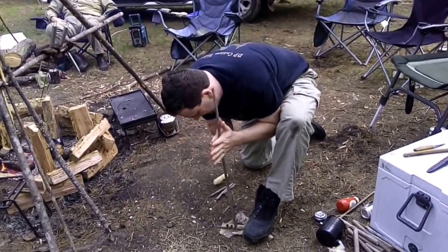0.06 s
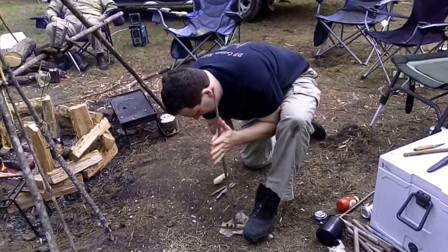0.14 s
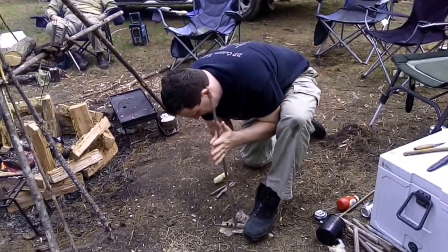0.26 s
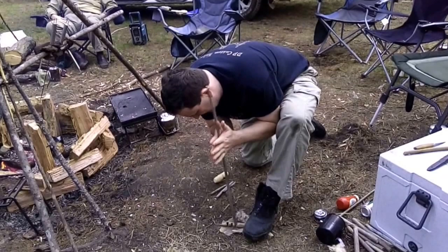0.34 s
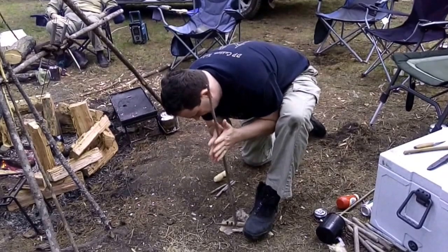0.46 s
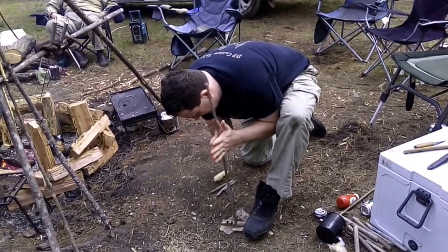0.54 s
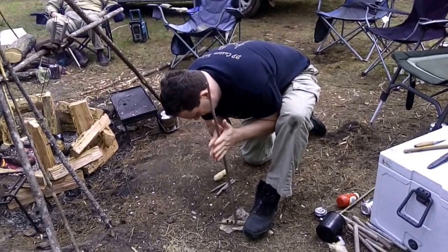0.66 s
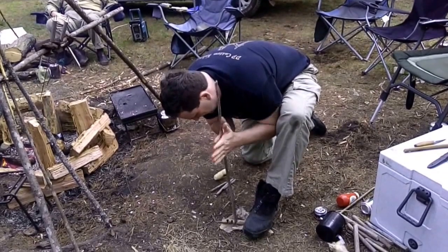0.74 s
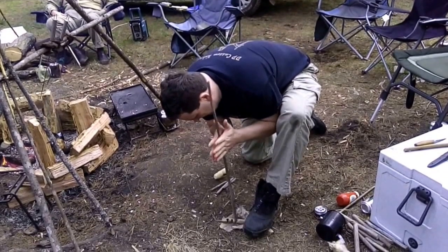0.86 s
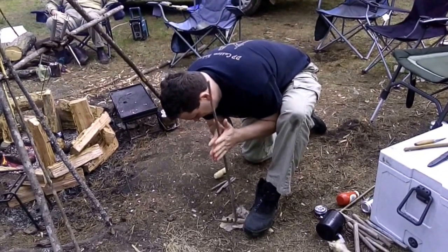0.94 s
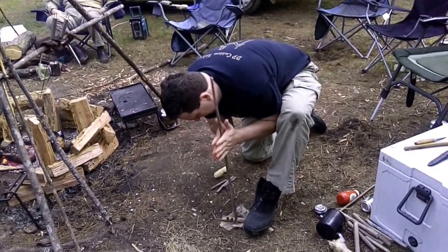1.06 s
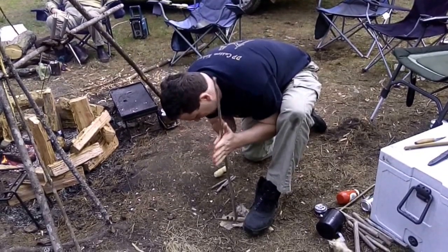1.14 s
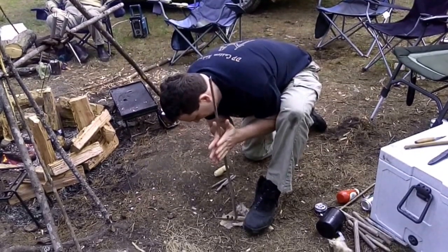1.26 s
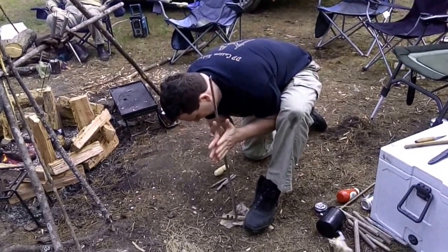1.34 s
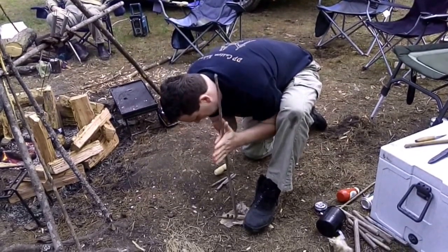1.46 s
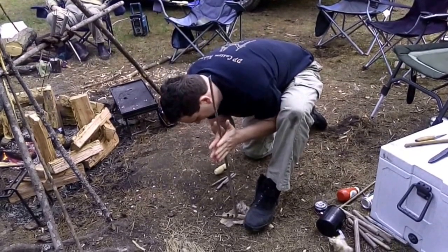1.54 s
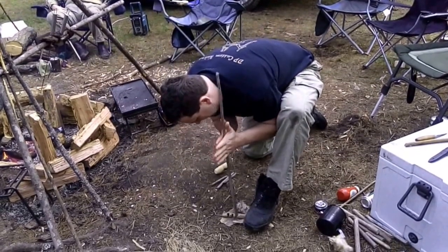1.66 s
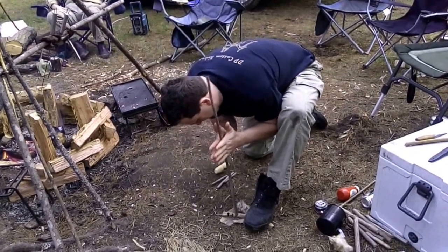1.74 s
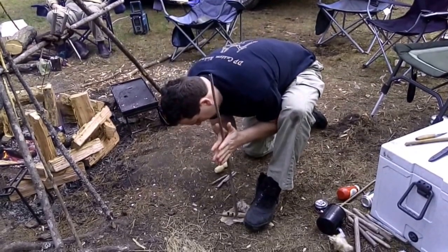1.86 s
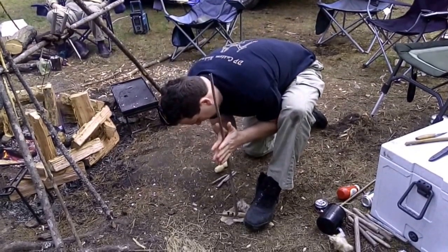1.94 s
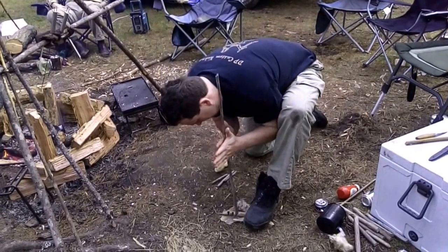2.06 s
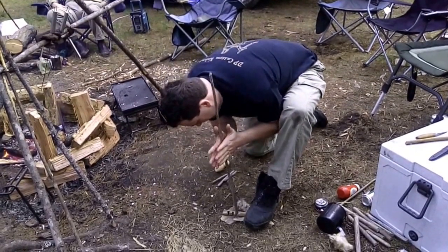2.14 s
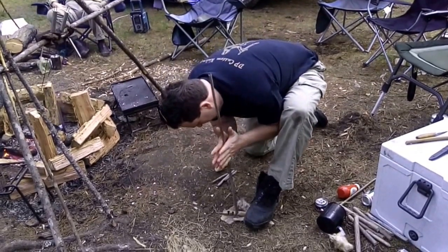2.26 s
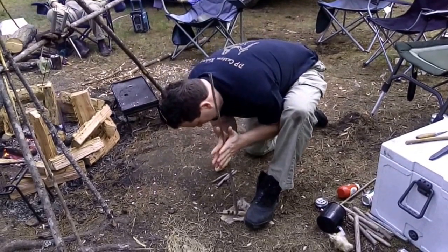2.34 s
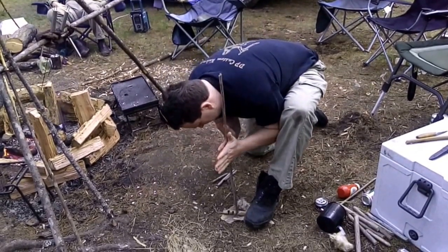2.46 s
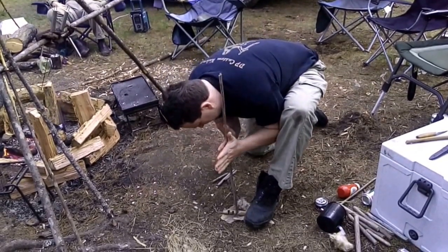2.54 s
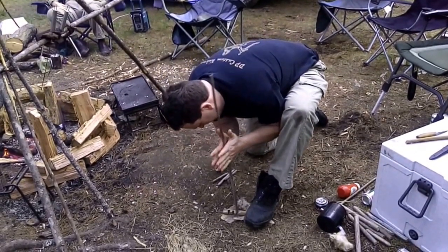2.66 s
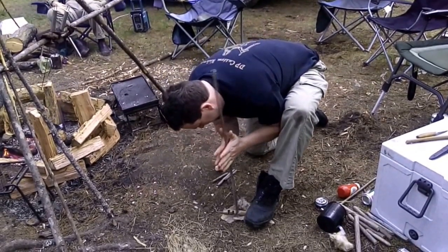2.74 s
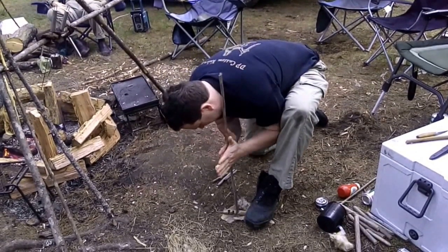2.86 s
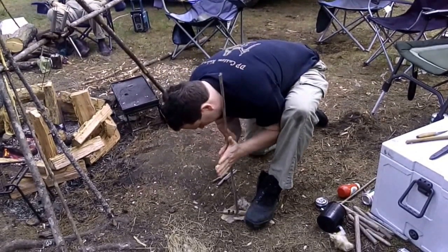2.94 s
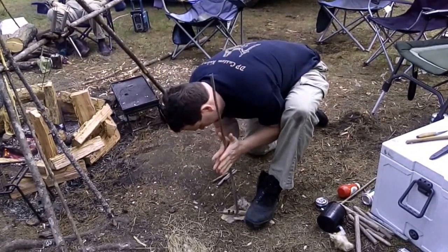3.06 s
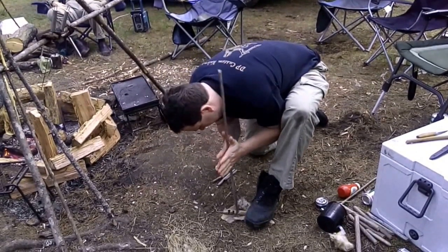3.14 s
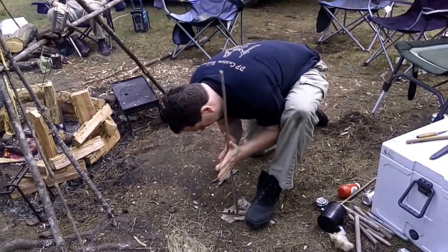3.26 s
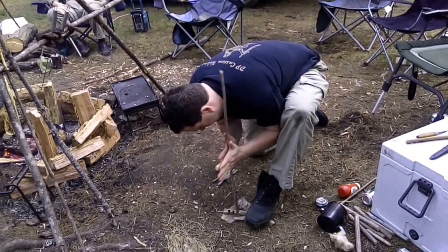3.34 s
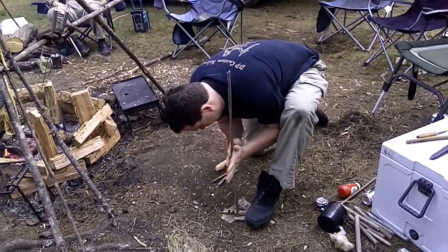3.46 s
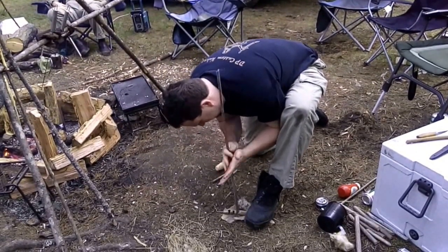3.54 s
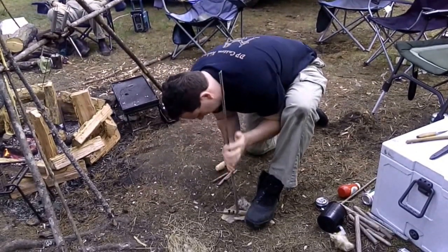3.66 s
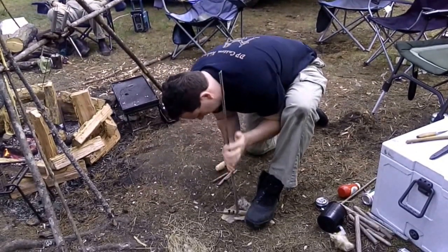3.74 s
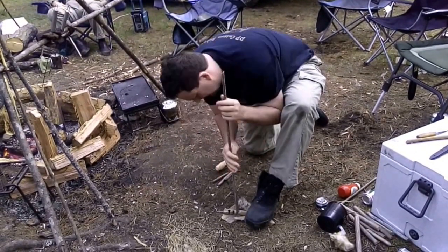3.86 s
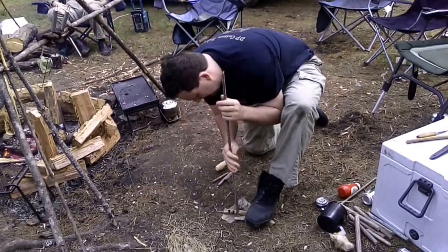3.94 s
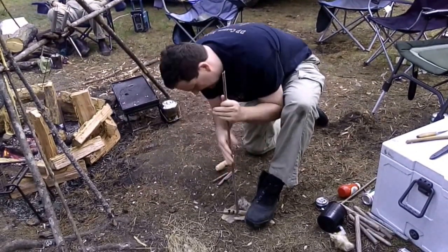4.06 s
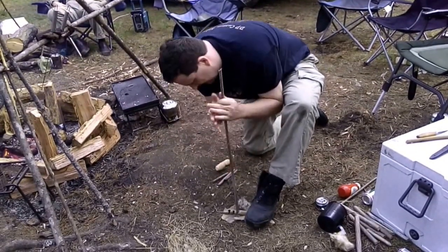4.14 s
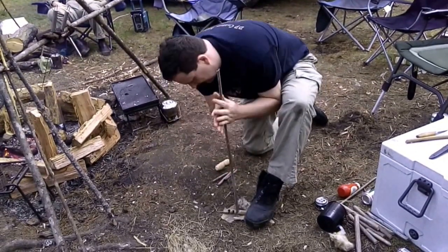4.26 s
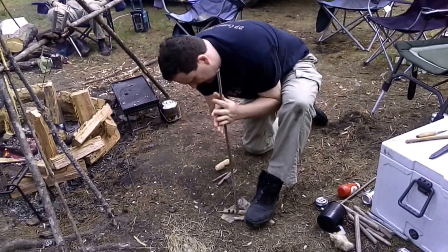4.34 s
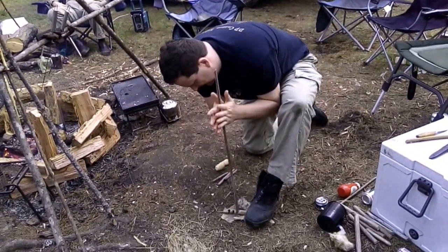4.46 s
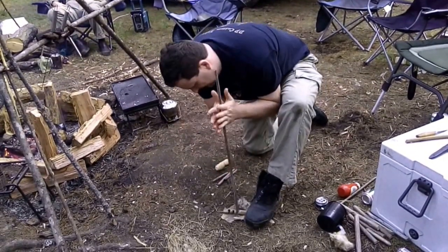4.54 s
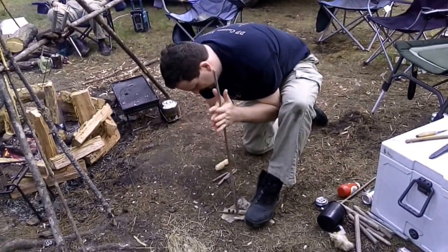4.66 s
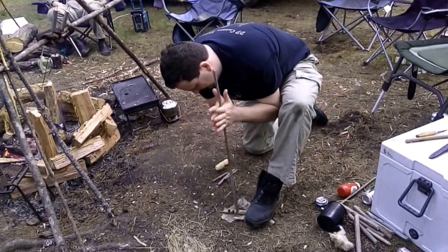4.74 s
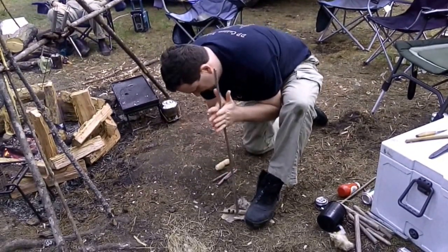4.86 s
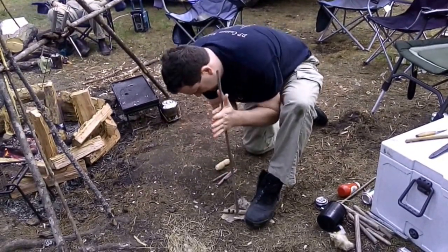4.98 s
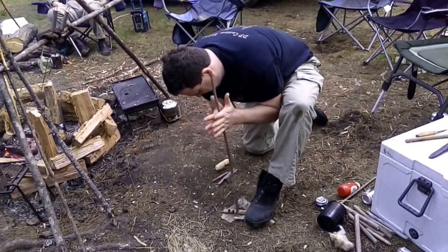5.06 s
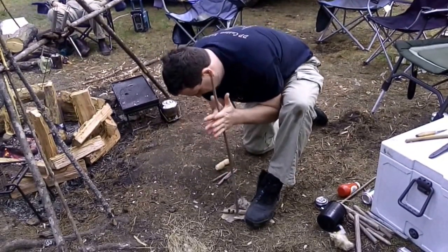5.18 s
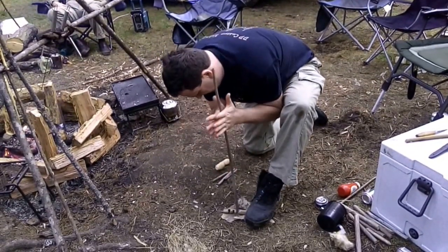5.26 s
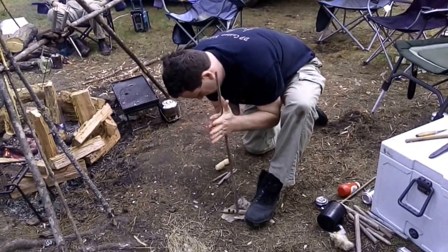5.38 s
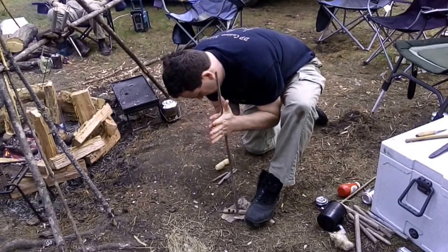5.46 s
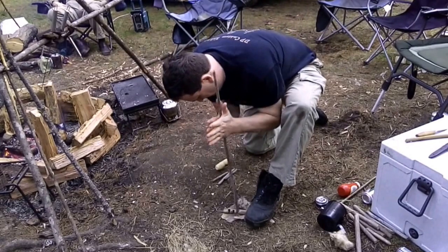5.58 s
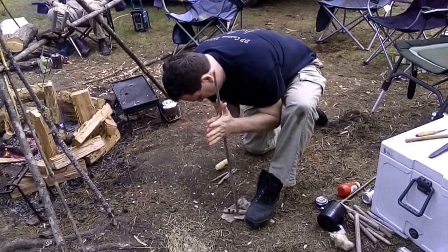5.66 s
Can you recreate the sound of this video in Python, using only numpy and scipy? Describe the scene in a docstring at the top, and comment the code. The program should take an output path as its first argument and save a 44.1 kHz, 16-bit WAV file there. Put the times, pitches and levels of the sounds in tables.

```python
"""A wooden spindle is rolled to and fro between two palms, its tip grinding in a board on the ground outdoors.
Each stroke is a swell of tiny random slips that hiss and ring the wood; ticks are short snaps with a knock,
and when the tip catches, ringing noise makes a hollow groan. After about four seconds the hands stop and slide
up the stick with a faint rustle of filtered slips and one low creak. A last stroke follows. Filtered noise
makes a quiet outdoor floor and a low rumble of uneven level, with brief swells in the pause."""
import sys
import numpy as np
from scipy import signal
from scipy.io import wavfile
from scipy.ndimage import uniform_filter1d

SR = 44100
rng = np.random.default_rng(int(sys.argv[2]) if len(sys.argv) > 2 else 0)


def to_wav(s):
    """Save 16-bit WAV."""
    ch = np.atleast_2d(s).T  # columns
    pcm = np.round(np.clip(ch, -1, 1) * 32767)  # PCM
    wavfile.write(sys.argv[1], SR, pcm.astype(np.int16))


N = 251983
T = np.arange(N) / SR  # time of every sample in seconds

# Strokes, out and back by turns. Each row: time of the turn in seconds, rub level at the turn in dB,
# rub level at full speed in dB, place of full speed within the stroke (0-1, later held to 0.2-0.8).
STROKES = [(0.022, -59.5, -30.5, 0.5), (0.178, -55.5, -29.5, 0.57), (0.288, -59, -29, 0.38),
           (0.418, -58, -31, 0.44), (0.515, -58, -26.5, 0.48), (0.622, -61.5, -29.5, 0.63),
           (0.73, -46.5, -27.5, 0.32), (0.843, -48.5, -29.5, 0.4), (0.974, -34.5, -26, 0.16),
           (1.073, -48, -29, 0.42), (1.183, -36.6, -26, 0.25), (1.284, -53, -27.5, 0.56),
           (1.407, -41, -23, 0.33), (1.517, -48, -26, 0.62), (1.626, -46.5, -25, 0.24),
           (1.734, -46.5, -25.5, 0.59), (1.836, -41.5, -25.0, 0.23), (1.948, -39, -24.5, 0.5),
           (2.057, -43.5, -22.5, 0.24), (2.177, -35, -25, 0.42), (2.278, -43.5, -23.0, 0.35),
           (2.387, -37, -24, 0.57), (2.486, -49.5, -23, 0.3), (2.589, -44, -24.5, 0.52),
           (2.691, -48.5, -23.5, 0.43), (2.791, -52, -26.0, 0.61), (2.897, -53, -25, 0.41),
           (3.013, -41.5, -24, 0.61), (3.116, -46, -25.0, 0.38), (3.235, -38, -26, 0.46),
           (3.328, -52.5, -26.5, 0.26), (3.446, -39, -26.5, 0.41), (3.537, -52.5, -25, 0.29),
           (3.652, -40.5, -26, 0.56), (3.744, -49.5, -27.0, 0.38), (3.858, -40, -26.5, 0.63),
           (3.948, -46, -26, 0.27), (4.052, -43, -27, 0.63), (4.156, -53, -28, 0.3),
           (5.571, -63, -28.5, 0.46)]
# Ways the board rings. Each row: pitch in Hz before the bend below, width in Hz, relative level in dB.
BOARD = [(860, 176, -2), (1157, 156, -3.5), (383, 350, -19)]
# The board's pitch falls as the hands work down, and is higher in the last stroke.
# Each row: time in seconds, factor on the pitch.
BOARD_PITCH = [(0, 1.09), (1.5, 1.06), (2.5, 1.065), (4.3, 1.008), (5.7, 1.32)]


def gain_of(db):
    """Turns decibels into amplitude."""
    return 10 ** (np.asarray(db) / 20)


def evened(x):
    """Scales a signal to an rms of 1."""
    return x / np.sqrt(np.mean(x ** 2) + 1e-20)


def along(rows):
    """Draws straight lines between (seconds, value) rows and reads them at every sample."""
    return np.interp(T, *np.transpose(sorted(rows)))


def coloured(x, points):
    """Filters x to a spectrum of (Hz, relative dB) points, with unit energy and no sound ahead of its cause."""
    f, db = np.transpose(points)
    hz = abs(np.fft.fftfreq(8192, 1 / SR))
    db_at_hz = np.interp(np.log(hz + 1), np.log(f), np.maximum(db, -100))
    log_gain = np.log(gain_of(db_at_hz))
    # the Hilbert transform gives the phase that puts the energy as early as possible
    taps = np.fft.ifft(np.exp(np.conj(signal.hilbert(log_gain)))).real[:4096]
    return signal.oaconvolve(x, taps / np.linalg.norm(taps))[:N]


def resonate(x, hz, width):
    """Rings at a fixed or moving pitch: shifts it down to zero, smooths twice and shifts back."""
    turn = np.exp(2j * np.pi * np.cumsum(hz * np.ones(len(x))) / SR)
    r = np.exp(-np.pi * width / SR)
    smooth = signal.lfilter([(1 - r) ** 2], [1, -2 * r, r * r], x / turn)
    return 2 * (turn * smooth).real


def wander(seconds):
    """Makes a smooth random curve of rms 1 that changes over this many seconds."""
    size = max(int(seconds * SR), 1)
    once = uniform_filter1d(rng.standard_normal(N), size)
    return evened(uniform_filter1d(once, size))


def slips(spread_db, clump_db, clump_s):
    """Makes dense stick-slip clicks of uneven size that come in clumps."""
    spread = spread_db * np.minimum(rng.exponential(1, N), 5)
    size = gain_of(spread + clump_db * wander(clump_s))
    return evened(size * rng.standard_normal(N))


def patchy(x, depth_db, width_hz, seconds):
    """Lets the colour drift in random patches over time and frequency, as the contact changes."""
    z = signal.stft(x, nperseg=256, noverlap=192)[2]
    field = rng.standard_normal(z.shape[::-1]).T
    bins = max(int(width_hz * 256 / SR), 1)
    frames = max(int(seconds * SR / 64), 1)
    field = uniform_filter1d(field, bins, axis=0)
    field = evened(uniform_filter1d(field, frames, axis=1))
    field -= field[22:44].mean(0)  # keeps the average change near 4-7.5 kHz at zero dB
    return evened(signal.istft(z * gain_of(depth_db * field), nperseg=256, noverlap=192)[1][:N])


def drill():
    """The slips hiss directly and ring board and spindle, all under the speed of the stroke."""
    # Colour of the rub. Each row: frequency in Hz, relative level in dB.
    rub_tone = [(400, -91), (1000, -19.5), (1550, -45), (1850, -26), (2300, -15), (3060, -11.5),
                (3500, -5.5), (4390, 1), (5200, 3), (6310, 6.5), (6700, 3.5), (7300, -5.5), (7910, -20.5),
                (9500, -65)]
    # The finest hiss, stronger later on as the tip polishes the hole. Each row: time in seconds, level in dB.
    fizz = [(0, -28.5), (1.5, -27), (2.8, -25), (3.3, -18.5), (4.2, -20.5), (5.6, -18)]
    # Colour of the finest hiss. Each row: frequency in Hz, relative level in dB.
    fizz_tone = [(6500, -16), (7800, 3), (9200, 0), (9700, -12.5), (10200, -17), (10800, -41)]
    # Ways the spindle rings. Each row: pitch in Hz, width in Hz, relative level in dB.
    spindle = [(2550, 240, -1.5), (2080, 380, -8), (3400, 450, -4.5)]
    # How strongly the wood rings. Each row: time in seconds, board level in dB, spindle level in dB,
    # both against the rub and midway between out and back strokes.
    wood = [(0, -26.5, -16), (.6, -27, -17.5), (1.2, -27.5, -18), (1.65, -32, -22.5), (2.2, -24.5, -15),
            (2.6, -28, -16.5), (3.2, -26, -14), (4.202, -24.5, -11.5), (5.6, -55, -18)]
    back_step_db = (2.5, -1)  # back stroke against out stroke: board louder, spindle softer

    speed = gain_of(uniform_filter1d(rubbing(), size=130))
    stroke = np.clip(np.searchsorted(np.transpose(STROKES)[0], T) - 1, 0, None)
    mean_speed = np.sqrt(np.bincount(stroke, speed ** 2) / np.bincount(stroke))[stroke]
    drive = slips(spread_db=0.5, clump_db=1.0, clump_s=0.0031)
    drive = patchy(drive, depth_db=1.0, width_hz=1500, seconds=.005)
    drive = patchy(drive, depth_db=0.35, width_hz=500, seconds=.04)

    flares = gain_of(2.2 * wander(0.0073))
    out = coloured(speed * flares * drive, rub_tone)
    fizz_speed = speed ** 0.87 * mean_speed ** 0.077
    out += coloured(fizz_speed * gain_of(along(fizz)) * drive, fizz_tone)

    # the wood follows the stroke more evenly than the hiss, and catches in short chatters
    wood_drive = drive * speed ** .8 * mean_speed ** .2
    s, *ring_db = np.transpose(wood)
    back = uniform_filter1d(stroke % 2 - .5, size=600)  # -0.5 on out strokes, +0.5 on back strokes
    pitches = (along(BOARD_PITCH), 1)
    for modes, wood_db, back_db, pitch in zip((BOARD, spindle), ring_db, back_step_db, pitches):
        level = gain_of(np.interp(T, s, wood_db) + back_db * back)
        for hz, width, db in modes:
            chatter = gain_of(3.82 * wander(0.025))
            bent = hz * pitch * (1 + .02 * wander(.04))  # the grip shifts the pitch a little
            ring = resonate(level * chatter * wood_drive, bent, width)
            # the root keeps narrow and wide rings about equally strong
            out += gain_of(db) * np.sqrt(SR / width / 2) * ring
    return out


def rubbing():
    """Gives the level of the rub in dB: a dip at each turn, a quick grip, a swell to full speed and back."""
    # The rub outside the strokes, dying at the start and silent in the pause.
    # Each row: time in seconds, rub level in dB.
    rests = [(0, -36), (4.31, -83), (5.56, -71)]
    stop_s, last_end_s = 4.275, 5.74  # the hands stop for a pause; the final stroke ends
    longest_s = 0.13  # the palms run out of length, then wait for the turn
    grip_s, let_go_s = 0.013, 0.018  # the rub jumps up after a turn and drops away before the next
    grip_db, let_go_db = (-11, -10), (-10, -5.5)  # against full speed at those moments: (out, back)

    turn, dip_db, top_db, place = np.transpose(STROKES)
    end = np.minimum(np.append(turn[1:], last_end_s), turn + longest_s)
    end[-2:] = stop_s, last_end_s
    way = np.arange(len(turn)) % 2  # 0 out, 1 back
    top_s = turn + np.clip(place, .2, .8) * (end - turn)
    end_db = np.append(dip_db[1:], dip_db[-1])
    times = [turn, turn + grip_s, top_s, end - let_go_s, end]
    levels = [dip_db, top_db + np.take(grip_db, way), top_db, top_db + np.take(let_go_db, way), end_db]
    return along(rests + list(zip(np.ravel(times), np.ravel(levels))))


def ticks():
    """Each tick is a snap of a few cycles, a few milliseconds of scatter and a knock in the wood."""
    # Ticks of the spindle and cracks of grit. Each row: time in seconds, peak of the snap in dB,
    # scatter in dB against that peak before it fades.
    tick_rows = [(.0275, -34, -19), (.1915, -26, -25), (.2905, -24, -33), (.3194, -16, -24),
                 (.4059, -28, -24), (.5212, -25, -22), (.627, -32, -11), (.7312, -13, -18),
                 (.8313, -12.5, -9.5), (.9578, -4, -57), (.9588, -7, -10.5), (.9647, -13.3, -18),
                 (1.0023, -12, -15), (1.061, -11, -17), (1.172, -5, -18), (1.1846, -12, -16),
                 (1.4006, -5.5, -26), (1.4106, -13, -16), (1.7234, -12.5, -11), (1.8318, -17, -24),
                 (1.8426, -21, -23), (1.859, -14.5, -12), (1.9344, -5, -17), (2.048, -10, -25),
                 (2.1526, -8.5, -16), (2.1557, -6.5, -6), (2.163, -9.5, -7.5), (2.2704, -5.5, -17),
                 (2.2826, -20.5, -1), (2.3151, -14, -7), (2.3716, -9.5, -10), (2.3825, -17, -12),
                 (2.5774, -10.5, -16), (2.6845, -9.4, -22), (2.6962, -17, -10), (2.7953, -21, -13),
                 (2.8474, -12, -25), (2.917, -23, -22), (2.9956, -7.5, -14), (3.134, -12.5, -10),
                 (3.213, -18, -1), (3.225, -13, -33), (3.4186, -14.5, -3), (3.4315, -19, 1),
                 (3.6289, -19.5, 2), (3.642, -22, -12.6), (3.8356, -18, 1), (3.847, -17, -7),
                 (4.0402, -19.5, -16), (4.2426, -18, -20), (4.265, -31, -25), (5.1927, -40, -25),
                 (5.5229, -24, -14.5), (5.6274, -25.5, 4), (5.6292, -14, -31)]
    tick_hz, tick_spread = 5500, 0.048  # usual pitch, and its random spread as a fraction
    click_tone = [(700, -36.5), (2500, 4), (4000, -10), (8000, 1), (10500, -35.5)]  # (Hz, relative dB)

    t = np.arange(-40, 700) / SR
    out, blows = np.zeros(N), np.zeros(N)
    scatter = rng.standard_normal((len(tick_rows), len(t)))
    for (s, db, scatter_db), noise in zip(tick_rows, scatter):
        hz = tick_hz * (1 + tick_spread * noise[0])
        snap = np.exp(-(t / 0.00019) ** 2) * np.cos(2 * np.pi * hz * t)
        grit = evened(resonate(resonate(noise, hz, 4100), hz, 4100))
        # falls 60 dB in 18 ms after a quick rise
        tail = grit * gain_of(scatter_db - 60 * t / .018) * np.clip(t / .0006, 0, 1)
        at = round(s * SR)
        out[at - 40:at + 700] += gain_of(db) * (snap + tail)
        blows[at] = gain_of(db)
    pitch = along(BOARD_PITCH)
    knock = sum(gain_of(db) * resonate(blows, hz * pitch, width) for hz, width, db in BOARD)
    click = coloured(blows, click_tone)
    return out + gain_of(-2.2) * knock + gain_of(-12.5) * click


def catches():
    """The tip catches, and a burst of slips rings the board in a short hollow groan."""
    # Each row: start in seconds, rough peak in dB, pitch in Hz.
    catch_rows = [(.989, -39, 970), (1.058, -47, 975), (1.17, -41, 976), (1.394, -37, 1066),
                  (1.553, -42.5, 886), (1.667, -46, 1026), (1.779, -39.5, 950), (1.978, -35, 966),
                  (2.05, -39.5, 1080), (2.13, -51, 1026), (2.2, -39.5, 1080), (2.417, -34, 863),
                  (2.612, -38, 870), (2.712, -53.5, 1120), (2.823, -31.5, 853), (3.043, -40.5, 840),
                  (3.149, -43, 713), (3.205, -38, 817), (3.412, -34, 800), (3.483, -36.5, 750),
                  (3.542, -55, 910), (3.612, -43, 860), (3.686, -31.5, 864), (3.903, -35, 838),
                  (3.987, -43.5, 945), (4.056, -38.5, 884), (4.108, -39, 840), (4.233, -44, 875)]
    groan_s = 0.029  # length of each groan

    out, bursts = np.zeros(N), rng.standard_normal((len(catch_rows), 4000))
    for (s, db, hz), noise in zip(catch_rows, bursts):
        u = np.arange(4000) / SR / groan_s
        swell = np.sin(np.pi * np.minimum(u, 1) ** 0.24)  # rises fast, fades slowly
        groan = evened(resonate(noise, hz, 67)) * swell
        out[round(s * SR):][:4000] += gain_of(db) * groan / 2  # half, as peaks stand well above the rms
    return out


def palms():
    """Skin slips along the stick in a rustle and makes the stick sound, with one low creak."""
    # The stick under the sliding palms. Each row: time in seconds, hollow part near 1.2 kHz in dB,
    # scrape near 2.5 kHz in dB.
    stick = [(4.26, -63, -61), (4.3, -63, -72), (4.36, -68, -89), (4.4, -101, -93.5), (5.16, -85, -99),
             (5.19, -61.5, -64), (5.22, -77, -71), (5.31, -73, -63), (5.35, -85, -77), (5.57, -91, -91)]
    # Colour of the rustle. Each row: frequency in Hz, relative level in dB.
    slide_tone = [(2000, -53), (2900, -29), (3560, -10.5), (4300, -4.5), (6390, 7.5), (7200, -2),
                  (9500, -25.5), (10500, -43)]
    # A short low creak as the palms grip: start in seconds, length in seconds, lowest pitch in Hz, level in dB.
    creak = (5.385, .075, 360, -64)

    sliding = (T > stick[0][0]) * (T < stick[-1][0])
    s, hollow_db, scrape_db = np.transpose(stick)
    skin = slips(spread_db=1.5, clump_db=1.5, clump_s=0.006)
    drive = sliding * patchy(skin, depth_db=2.0, width_hz=980, seconds=0.017)
    rustle = coloured(brushing() * drive, slide_tone)
    for db, hz, width in ((hollow_db, 1180, 300), (scrape_db, 2550, 600)):
        ring = resonate(drive, hz, width)
        rustle += gain_of(np.interp(T, s, db)) * np.sqrt(SR / width / 2) * ring

    start, length, hz, db = creak
    u = np.clip((T - start) / length, 0, 1)
    turns = np.cumsum(hz * (1 + .12 * (2 * u - 1) ** 2)) / SR  # the pitch dips midway
    uneven = np.sin(2 * np.pi * turns) + 0.54 * np.sin(np.pi * turns)  # with a tone an octave below
    uneven += 0.75 * evened(resonate(rng.standard_normal(N), 410, 130))
    return rustle + gain_of(db) * np.sin(np.pi * u) ** 0.17 * uneven


def brushing():
    """Gives the strength of the palms on the stick: each brush touches quickly, slides and lifts off."""
    # Each row: moment of full touch in seconds, length in seconds, level in dB at first, level in dB at last.
    brushes = [(4.264, 0.15, -52.5, -61), (4.384, 0.066, -53, -53), (4.461, .22, -68, -78),
               (4.718, 0.07, -44.5, -53.5), (4.81, .06, -59.5, -59), (4.893, 0.042, -65, -63),
               (4.968, 0.013, -52.5, -53.5), (5.006, 0.06, -59, -68), (5.124, 0.077, -68.5, -46.5),
               (5.182, 0.12, -55, -44.5), (5.388, 0.055, -53.5, -54), (5.485, 0.027, -48.5, -59)]
    touch_s, lift_db_per_s = 0.031, -420  # rise ahead of full touch; fall after the brush

    out = np.zeros(N)
    for start, length, first_db, last_db in brushes:
        t = T - start
        slide_db = np.interp(t, [0, length], [first_db, last_db])
        db = slide_db + lift_db_per_s * np.maximum(t - length, 0)
        touch = np.clip(1 + t / touch_s, 0, 1) ** 2
        out = np.maximum(out, gain_of(db) * touch)  # the stronger brush wins
    return out


def air():
    """Filtered noise makes a soft wide floor and a low rumble of uneven level."""
    # Colour of the outdoor floor. Each row: frequency in Hz, relative level in dB.
    floor_tone = [(90, -26.5), (200, -15.5), (480, -15.5), (700, -19), (1000, -20), (1700, -23),
                  (3000, -26.5), (4500, -37), (5900, -19), (7000, -32), (8500, -44), (10500, -50)]
    # Low rumble of uneven level, with brief swells in the pause.
    # Each row: time in seconds, level in dB around which it wavers.
    rumble = [(0, -69), (2, -71), (3, -75.5), (4.4, -69.5), (4.5, -61), (4.62, -73), (4.82, -71),
              (4.91, -61), (5.05, -74), (5.15, -60.5), (5.25, -76), (5.42, -69.5), (5.71, -76)]
    rumble_tone = [(20, -34.5), (55, 5.0), (150, 6), (260, -11.5), (500, -50.5)]  # (Hz, relative dB)

    floor_level = gain_of(-70.5 + wander(0.086))  # drifts by about 1 dB
    floor = floor_level * coloured(rng.standard_normal(N), floor_tone)
    uneven = gain_of(along(rumble) + 2.8 * wander(.04)) * rng.standard_normal(N)
    return floor + coloured(uneven, rumble_tone)


def scene():
    """Adds all sounds together at one microphone."""
    return (drill() + catches() + ticks() + palms() + air())[None]


def record(dry):
    """Removes what lies above about 11 kHz."""
    edge_hz = 11000
    low_pass = signal.firwin(255, edge_hz, window=("kaiser", 6), fs=SR)
    return signal.oaconvolve(dry, low_pass[None], "same")


dry = scene()
out = record(dry)
to_wav(out)
```